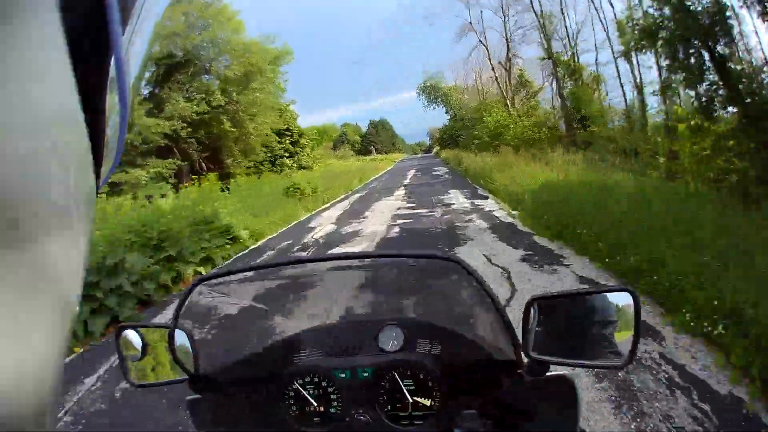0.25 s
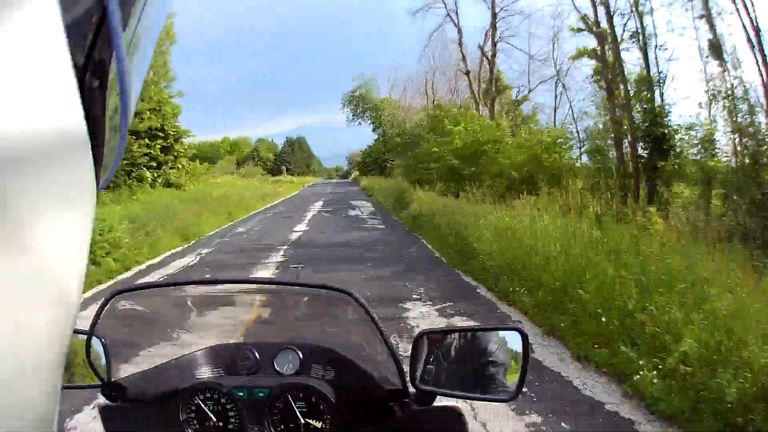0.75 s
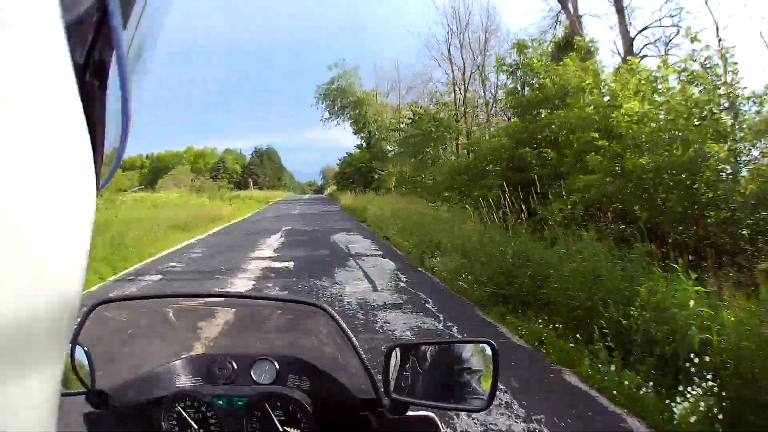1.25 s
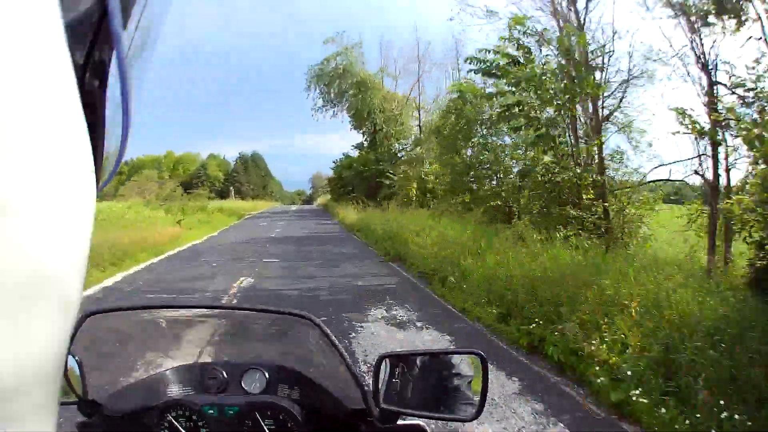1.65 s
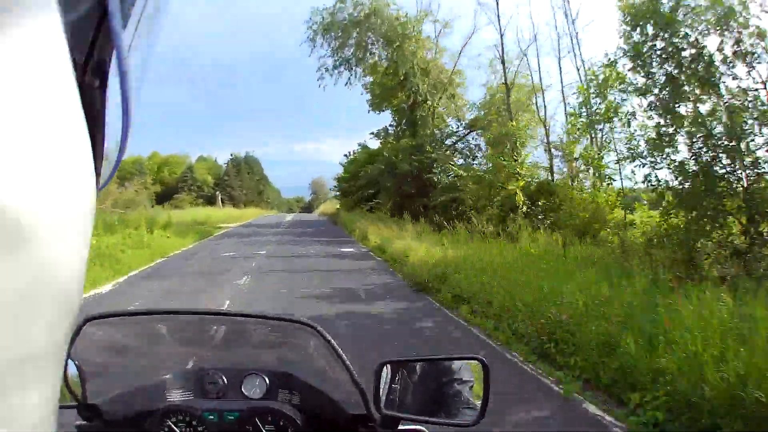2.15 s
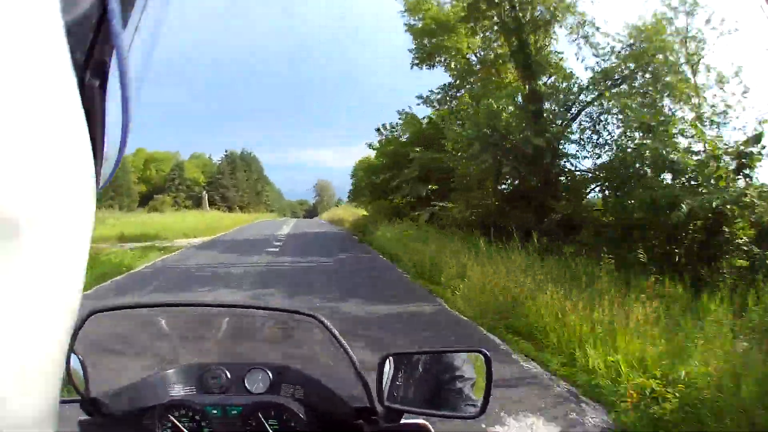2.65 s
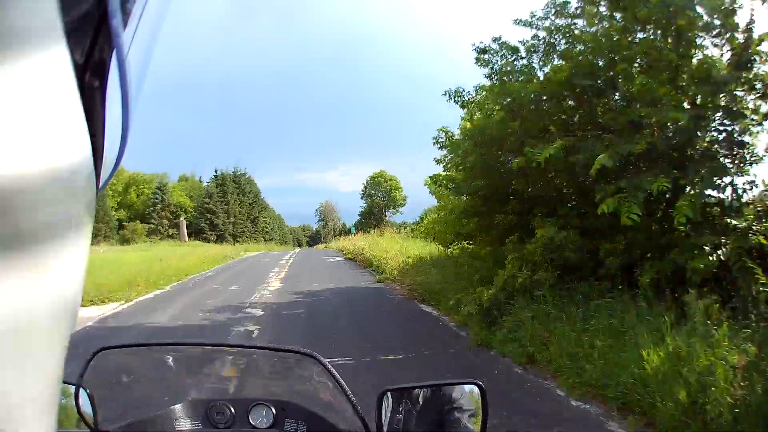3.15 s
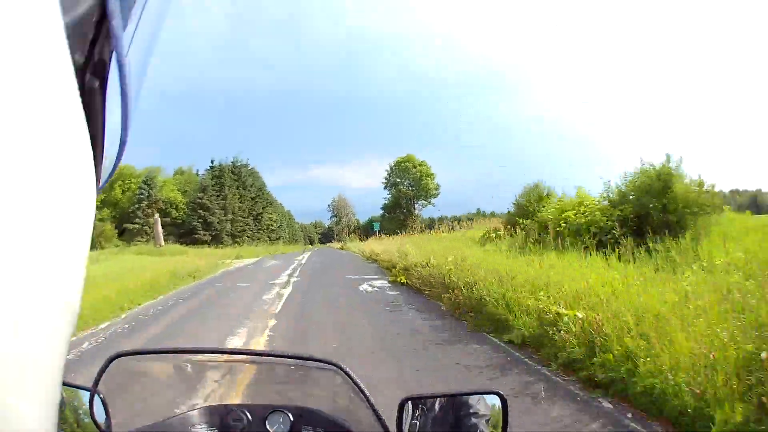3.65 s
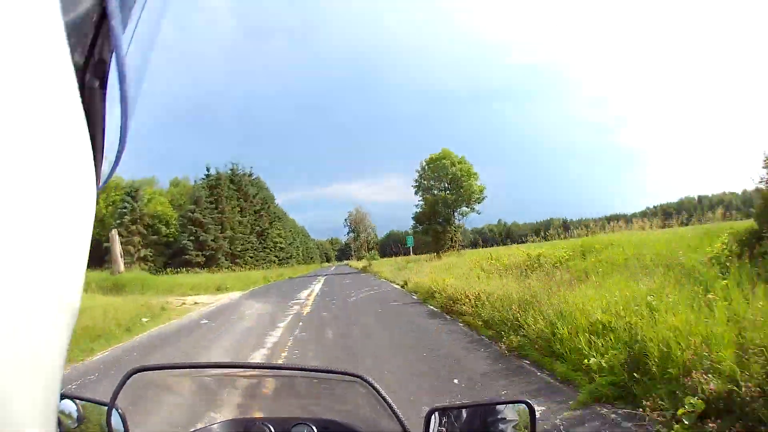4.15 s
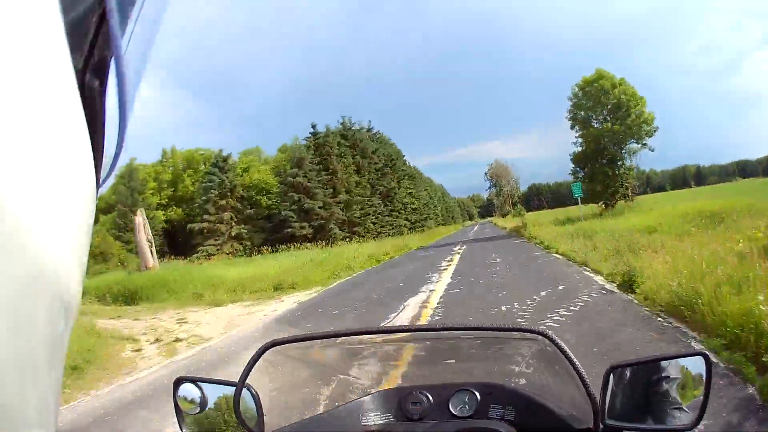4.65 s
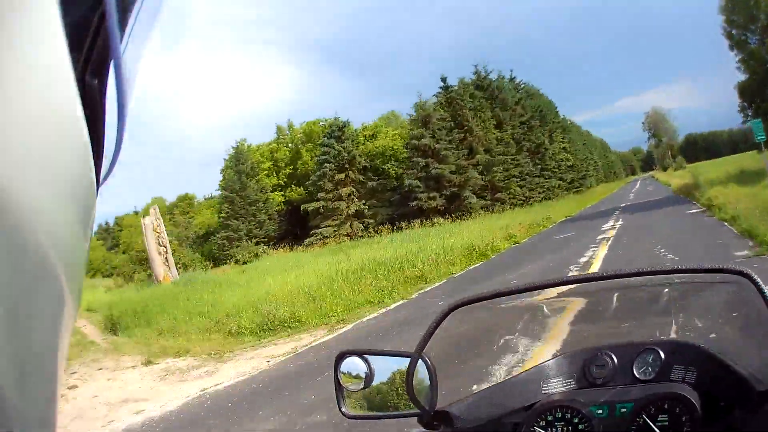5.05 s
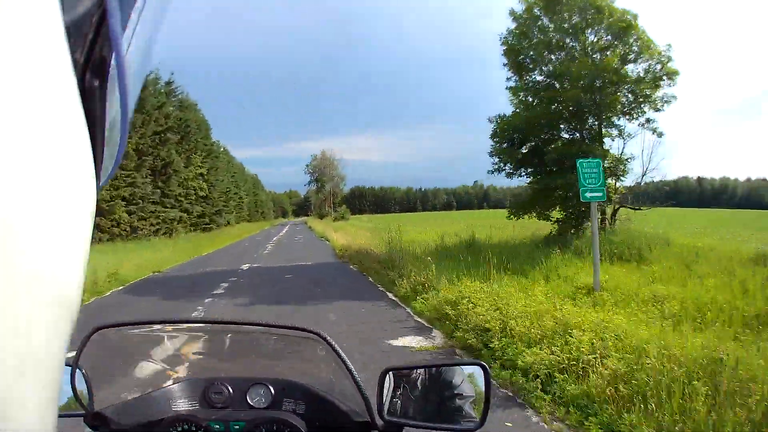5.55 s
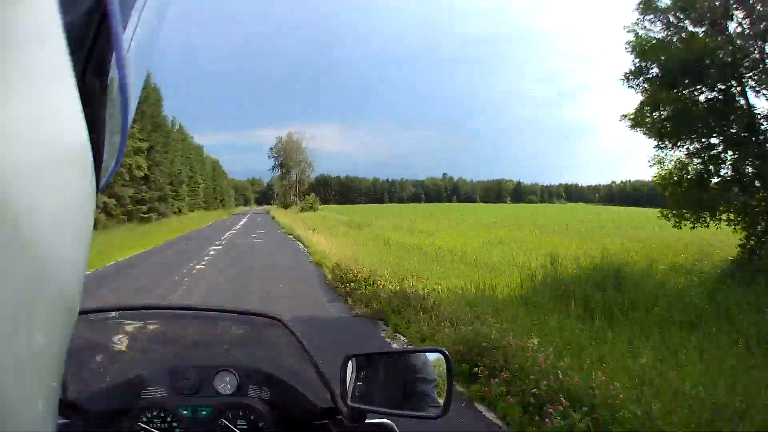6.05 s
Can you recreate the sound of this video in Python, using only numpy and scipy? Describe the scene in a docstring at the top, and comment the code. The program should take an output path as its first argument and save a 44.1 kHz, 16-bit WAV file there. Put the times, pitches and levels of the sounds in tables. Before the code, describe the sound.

Gusty wind rumbles and slaps on a microphone behind the windscreen of a moving motorcycle on a rural road. The engine holds an even drone with mechanical ticking and a thin whine, then drops away into a soft, falling burble as the bike coasts. Several patches of rough road shake the panels and loose fittings in short clattering bursts. Finally the rider blips the throttle and the revs climb.

```python
"""Motorcycle on a country road

From the rider's seat, the microphone just behind the windscreen: the bike cruises, slows with the
throttle closed, and after a blip pulls again. Gusts tumble over the microphone, which crackles faintly;
an arm's length ahead, bumps in the patched road shake the fairing and its loose fittings. From below,
the valve gear clatters, a gear whine slides with the revs and the exhaust drones with throttle and revs."""
import sys
import numpy as np
from scipy import signal
from scipy.fft import rfft, irfft, next_fast_len
from scipy.io import wavfile

SR = 44100
rng = np.random.default_rng(int(sys.argv[2]) if len(sys.argv) > 2 else 0)


def int16_out(signal):
    """Quantize to a 16-bit WAV file."""
    q = np.round(np.clip(np.atleast_2d(signal).T, -1, 1) * 32767)
    wavfile.write(sys.argv[1], SR, q.astype(np.int16))


N = 277389
CRUISE_SPEED = 49  # crank turns per s


def from_db(db):
    """Decibels to gain."""
    return 10 ** (np.asarray(db) / 20)


def unit_rms(x):
    """Scale to rms 1."""
    return x / np.sqrt(np.mean(x ** 2) + 1e-20)


def curve(rows):
    """Join (time, value) points into a value at every sample."""
    return np.interp(np.arange(N) / SR, *np.transpose(rows))


def butter(x, hz, kind):
    """Second-order Butterworth filter."""
    return signal.sosfilt(signal.butter(2, hz, kind, fs=SR, output="sos"), x + 1e-18)


def drift(rate):
    """Smooth random wander with spread 1, changing about rate times a second."""
    step, settle = 40, 2000
    pole = np.exp(-2 * np.pi * rate * step / SR)
    noise = rng.standard_normal(N // step + settle + 2)
    slow = signal.lfilter([1], [1, -2 * pole, pole ** 2], noise)[settle:]
    return np.interp(np.arange(N) / step, np.arange(len(slow)), unit_rms(slow))


def resonate(x, hz, width):
    """Two-pole resonance with gain 1 at its peak."""
    r = np.exp(-np.pi * width / SR)
    poles = [1, -2 * r * np.cos(2 * np.pi * hz / SR), r * r]
    return signal.lfilter(np.array([1, 0, -1]) * (1 - r * r) / 2, poles, x)


def colour(x, spectrum):
    """Filter by a smooth spectrum that falls 20 dB per octave beyond its ends; rms 1."""
    hz, db = np.transpose(spectrum)
    size = next_fast_len(N)
    octave = np.log2(np.maximum(np.arange(size // 2 + 1) * SR / size, 1))
    points = np.log2(hz)
    outside = np.abs(octave - np.clip(octave, points[0], points[-1]))
    gain = from_db(np.interp(octave, points, db) - 20 * outside)
    return unit_rms(irfft(rfft(x, size) * gain, size)[:N])


def grains(per_s, spread_db):
    """Clicks at random moments, a few much larger than the rest."""
    return (rng.random(N) < per_s / SR) * from_db(spread_db * np.minimum(rng.exponential(1, N), 3))


def swell(start_s, length_s, attack_s=.027, release_s=.069):
    """Attack, hold and release, from 0 to at most 1 and back."""
    t = np.arange(N) / SR - start_s
    return np.clip(np.minimum(t / attack_s, 1 - (t - length_s) / release_s), 0, 1)


def turbulence(spectrum, swirl_db, eddies_per_s, eddy_db, spread_db):
    """Smooth flow noise plus brief suctions as single eddies pass; rms 1."""
    eddies = unit_rms(butter(grains(eddies_per_s, spread_db), 7, "high"))
    flow = rng.standard_normal(N) - from_db(eddy_db) * eddies
    return colour(flow * from_db(swirl_db), spectrum)


# The loudest crackles, in the microphone itself: (time [s], relative level [dB])
MIC_CRACKLES = [(0.057, -33.5), (0.0736, -39), (0.1994, -44), (0.5087, -38.5), (0.6263, -35.5),
                (0.6873, -43), (0.7125, -41.5), (0.888, -35.5), (1.0002, -42), (1.1802, -40.5),
                (1.2152, -44), (1.408, -42), (1.432, -37.5), (1.6292, -37.5), (2.0643, -42), (2.0934, -38),
                (2.279, -43), (2.388, -37.5), (2.5843, -37.5), (2.6342, -44), (2.7811, -38), (2.8552, -37),
                (2.8935, -35.5), (3.0684, -44), (3.2817, -35), (3.3699, -34.5), (3.652, -45), (3.7584, -38),
                (3.8004, -39), (3.9038, -36.5), (4.0986, -44), (4.2718, -38), (4.2946, -57), (4.4612, -39),
                (4.5163, -42), (4.59, -44), (4.6244, -36.5), (4.6536, -45), (4.816, -34.5), (4.8499, -49),
                (5.1295, -37.5), (5.1774, -45), (5.5444, -35), (5.6136, -46), (5.6244, -38.5), (5.659, -48),
                (5.6714, -35.5), (5.8191, -36), (6.0666, -46), (6.0863, -37.5), (6.1063, -38)]
def crackle(length_s, burst_db, ticks_per_s, tick_db):
    """Bursts of tiny pressure steps and bunches of faint ticks, coloured by the microphone port."""
    s, db = np.transpose(MIC_CRACKLES)
    onsets = np.zeros(N)
    onsets[np.round(s * SR).astype(int)] = from_db(db)
    gate = signal.lfilter(np.ones(int(length_s * SR) + 1), [1], onsets)
    steps = from_db(burst_db) * gate * rng.standard_normal(N)
    ticks = from_db(tick_db) * grains(ticks_per_s * from_db(2 * drift(3)), spread_db=3)
    pressure = butter(np.cumsum(steps + ticks), 2000, "high")
    return pressure + .5 * resonate(pressure, hz=3500, width=490)


# Rush and hiss of air and tyres, all around the seat: (frequency [Hz], relative level [dB])
RUSH_SPECTRUM = [(250, -13), (420, 2), (600, -1), (800, -2.5), (1100, -9), (1450, -10.5), (1800, -16),
                 (2300, -17), (3000, -30.5), (4500, -51)]
HISS_SPECTRUM = [(1800, 6), (2800, 5.5), (3600, 3), (5000, -2), (7000, -10), (9000, -20), (12000, -21.5),
                 (16000, -38)]
# Gusts off the windscreen: (start [s], length [s], rise of the rush [dB], rise of the hiss [dB])
WINDSCREEN_GUSTS = [(-.03, 0.032, 13.5, 6.8), (0.368, 0.48, 4.5, 2.6), (1.114, 0.15, 1.5, .5),
                    (1.3, 0.26, 6, 2.3), (1.95, 0.12, 5, 3.2), (2.212, 0.16, 5, 2.3), (2.466, 0.26, 5, 1.1),
                    (2.753, 0.55, 3, 3.5), (3.53, 0.25, 5.5, 5.6), (4.38, 0.16, 5.5, 2.4),
                    (4.941, 0.17, 9, 5), (5.163, 0.578, 6, 3.3), (5.917, 0.2, 6.5, 2.6),
                    (6.143, 0.16, 5.5, 2.3)]
def airflow(revs_octaves, swirl, rush_db, hiss_db, db_per_octave):
    """Rush and hiss flutter in the windscreen's wake, rise with each gust and ease as the revs fall."""
    rises = [np.outer(rises_db, swell(s, length)) for s, length, *rises_db in WINDSCREEN_GUSTS]
    rush_rise_db, hiss_rise_db = np.max(rises, axis=0)
    rush = turbulence(RUSH_SPECTRUM, 1.21 * swirl, eddies_per_s=400, eddy_db=-5, spread_db=6.5)
    hiss = colour(rng.standard_normal(N) * from_db(2 * swirl), HISS_SPECTRUM)
    air = rush * from_db(rush_db + rush_rise_db) + hiss * from_db(hiss_db + hiss_rise_db)
    return air * from_db(db_per_octave * revs_octaves + .5 * drift(5.1))


# Deep rumble and buffeting, right on the microphone: (frequency [Hz], relative level [dB])
RUMBLE_SPECTRUM = [(18, 4), (35, -2), (70, 4), (140, 3.5), (190, -7.5), (300, -30)]
BUFFET_SPECTRUM = [(110, -12.5), (190, -0.5), (300, -1), (450, -8), (700, -27.5), (1200, -37)]
# Strength of the buffeting behind the windscreen: (time [s], relative level [dB])
WAKE_STRENGTH = [(0.0, -25.5), (0.14, -35.5), (1.7, -30), (2.0, -30.5), (2.01, -25.5), (2.31, -35),
                 (2.38, -31.5), (2.73, -34), (2.79, -31.5), (3.35, -30.5), (3.43, -36.5), (3.78, -30.5),
                 (4.01, -37.5), (4.57, -31.5), (4.64, -36.5), (4.92, -39), (5.1, -28.5), (5.17, -35),
                 (5.62, -29), (5.87, -33.5), (6.01, -26), (6.25, -33.5), (6.29, -27)]
def buffeting(swirl, buffet_db, rumble_db, rumble_follows):
    """The windscreen's wake buffets the microphone; a deep rumble follows a share of its swings."""
    wake_db = curve(WAKE_STRENGTH)
    swing_db = rumble_follows * (wake_db - wake_db.mean())
    rumble = colour(rng.standard_normal(N), RUMBLE_SPECTRUM)
    buffet = turbulence(BUFFET_SPECTRUM, 1.63 * swirl, eddies_per_s=220, eddy_db=-6, spread_db=7)
    return rumble * from_db(rumble_db + swing_db) + buffet * from_db(buffet_db + wake_db)


# Hard slaps of wind on the microphone: (time [s], peak level [dB], pitch [Hz])
WIND_SLAPS = [(0.121, -23, 700), (0.741, -18, 780), (1.719, -22.5, 650), (2.458, -21, 650),
              (3.413, -19, 450), (3.583, -22, 620), (4.949, -22, 900), (6.005, -16.5, 600)]
def slaps(cycles, rise_s):
    """A large eddy sucks at the microphone, then swings back and dies within a few cycles."""
    out, t = np.zeros(N + SR), np.arange(SR // 30) / SR
    for s, db, hz in WIND_SLAPS:
        eddy = -(1 - np.exp(-t / rise_s)) * np.exp(-t * hz / cycles) * np.sin(2 * np.pi * hz * t)
        out[int(s * SR):int(s * SR) + len(t)] += from_db(db) * eddy / np.abs(eddy).max()
    return out[:N]


# Bumps in the road, as the front wheel meets them: (time [s], relative level [dB])
ROAD_BUMPS = [(2.85, -32), (3.85, -31), (4.44, -29.5), (5.506, -27), (5.939, -23.5), (6.034, -38)]
# The shaken fairing, an arm's length ahead: (frequency [Hz], relative level [dB])
FAIRING_SPECTRUM = [(220, 1), (420, 8.5), (800, -3), (1500, -4), (2400, -17), (4000, -28)]
REAR_WHEEL_LAG_S, REAR_WHEEL_DB = .041, -12
def jolts(length_s, release_s, contacts_per_s):
    """Both wheels cross each bump and set the fairing panels crunching against their mounts."""
    contacts = grains(contacts_per_s, spread_db=3) * rng.choice([-1, 1], N)
    wheels = [(0, 0), (REAR_WHEEL_LAG_S, REAR_WHEEL_DB)]
    shaking = sum(from_db(db + wheel_db) * swell(s + lag_s, length_s, release_s=release_s)
                  for s, db in ROAD_BUMPS for lag_s, wheel_db in wheels)
    return colour(contacts, FAIRING_SPECTRUM) * shaking


# Small loose parts in the fairing: (frequency [Hz], width [Hz], relative level [dB])
SMALL_PART_MODES = [(1800, 200, 1), (2250, 250, 1), (2900, 350, -5), (3700, 400, -8), (5200, 700, -14)]
def chatter(contacts_per_s, spread_db, level_db, stirred_db):
    """Small parts tick at random, harder in each gust and after each bump."""
    gusts = [swell(s, length) for s, length, *_ in WINDSCREEN_GUSTS]
    bumps = [swell(s, 2 * REAR_WHEEL_LAG_S) for s, _ in ROAD_BUMPS]
    stirred = np.max(gusts + bumps, axis=0)
    ticks = np.zeros(N)
    for hz, width, db in SMALL_PART_MODES:
        contacts = grains(contacts_per_s, spread_db) + 1e-18 * rng.standard_normal(N)
        ticks += from_db(db) * unit_rms(resonate(contacts, hz, width))
    return from_db(level_db + stirred_db * stirred) * unit_rms(ticks)


# Loose fittings just ahead of the microphone: (time [s], relative level [dB], ring [Hz])
FITTING_RATTLES = [(1.5853, -40, 2800), (2.7616, -36, 2400), (2.8599, -34, 2600), (2.881, -34, 1700),
                   (2.940, -41, 5000), (2.990, -39, 3000), (3.2311, -37, 2300), (3.9539, -40, 4000),
                   (4.2972, -37, 2300), (4.3485, -37, 2140), (4.4437, -31.5, 2140), (4.4957, -36, 2140),
                   (4.555, -35, 2140), (4.949, -39, 3200), (5.0055, -34, 2500), (5.5119, -26, 2200),
                   (5.5368, -36, 2140), (5.5695, -32, 2300), (5.7339, -41, 2600), (5.952, -35, 2140)]
def rattles(decay_s, dull_hz, width_hz, ring_db, click_db):
    """Each contact clicks and briefly rings its loose fitting."""
    out, t = np.zeros(N + SR), np.arange(SR // 10) / SR
    for s, db, ring_hz in FITTING_RATTLES:
        contact = butter(from_db(db) * np.exp(-t / decay_s) * rng.standard_normal(len(t)), dull_hz, "low")
        ring = from_db(ring_db) * resonate(contact, ring_hz, width_hz)
        click = from_db(click_db) * resonate(contact, hz=3500, width=3000)
        out[int(s * SR):int(s * SR) + len(t)] += ring + click
    return out[:N]


# The fairing hits its mounts over the bumps, close by: (time [s], peak level [dB], brightness [Hz])
FAIRING_KNOCKS = [(2.828, -15.5, 900), (2.861, -20, 2500), (2.867, -13.5, 700), (2.874, -19, 1500),
                  (2.881, -15, 2000), (2.889, -19, 1600), (2.917, -22, 1200), (2.941, -23, 2000),
                  (2.961, -19, 900), (2.990, -18, 1200), (3.858, -21, 1500), (3.880, -15, 1400),
                  (3.917, -18, 2400), (3.934, -22, 1100), (4.472, -22, 1000), (5.519, -18, 2200),
                  (5.526, -17, 700), (5.539, -19, 2400), (5.552, -19, 1900), (5.617, -20, 1800),
                  (5.667, -21, 1700), (6.050, -21, 2200)]
# Resonances of its panels: (frequency [Hz], width [Hz], relative level [dB])
PANEL_MODES = [(342, 180, 6), (574, 230, 0), (907, 140, -6), (1250, 260, -1.5), (1510, 83, -18.5),
               (2120, 120, -24)]
def knocks(contact_s, grit, mount_hz, scatter_db, detune):
    """Each knock is a push and a short scrape that ring the panels, a little differently each time."""
    out, t = np.zeros(N + SR), np.arange(SR // 10) / SR
    for s, db, bright_hz in FAIRING_KNOCKS:
        push = signal.unit_impulse(len(t))
        scrape = grit * np.exp(-t / contact_s) * rng.standard_normal(len(t))
        contact = butter(butter(scrape - push, bright_hz, "low"), mount_hz, "low")
        ring = np.zeros(len(t))
        for hz, width, mode_db in PANEL_MODES:
            gain = from_db(mode_db + scatter_db * rng.standard_normal())
            ring += gain * resonate(contact, hz * (1 + detune * rng.uniform(-1, 1)), width)
        out[int(s * SR):int(s * SR) + len(t)] += from_db(db) * ring / np.abs(ring).max()
    return out[:N]


# The main gear whine, from below the seat: (time [s], level [dB])
WHINE_LEVEL = [(0, -41), (.3, -39.5), (1.38, -40), (1.6, -52), (2.55, -48), (3.0, -58), (3.45, -56),
               (3.57, -40), (4.0, -52), (4.85, -49), (5.05, -41), (5.5, -40), (5.65, -52)]
# Gear and chain tones: (order [cycles per crank turn], relative level [dB])
GEAR_ORDERS = [(4, -8), (5, -10), (11.5, -12), (13.17, -10), (16.5, -16), (17.5, -15), (36, -22)]
def gears(turns, tones_db, teeth_per_turn, flutter_db, waver_db, backlash_rad):
    """Meshing teeth sing at multiples of the crank speed; backlash blurs them."""
    mesh = 2 * np.pi * teeth_per_turn * turns + backlash_rad * drift(22)
    # The gear cover rings when the octave of the whine slides through its resonance.
    cover = from_db(-46) * resonate(np.sin(2 * mesh), hz=1392, width=16)
    whine = from_db(curve(WHINE_LEVEL)) * np.sin(mesh) + cover
    tones = np.zeros(N)
    for order, db in GEAR_ORDERS:
        gain = from_db(db + waver_db * drift(2.1))
        tones += gain * np.sin(2 * np.pi * order * turns + backlash_rad * drift(9.9))
    return np.sqrt(2) * (from_db(flutter_db * drift(12)) * whine + from_db(tones_db) * tones)


def drive_thump(at_s, peak_db, length_s):
    """As the throttle snaps shut, the slack of the drive is taken up in one soft push."""
    return from_db(peak_db) * np.exp(-(2 * (np.arange(N) / SR - at_s) / length_s) ** 2)


# Clatter of the engine, about a metre below the microphone: (time [s], level [dB])
CLATTER_LEVEL = [(0, -35.5), (1.45, -36.5), (1.8, -38.5), (2.5, -39.5), (3.2, -36.5), (4.1, -38),
                 (5.4, -37.5), (6.29, -42)]
# Resonances of its casing: (frequency [Hz], width [Hz], relative level [dB])
CASING_MODES = [(512, 118, -1.5), (638, 131, 4.5), (814, 143, 2), (985, 112, -2), (1361, 162, -6.5),
                (1762, 69, -6.5), (2016, 80, -10.5), (2474, 88, -16), (2760, 190, -21)]
def clatter(turns, uneven, noise, count=20):
    """Valves, pistons and cam chain knock at the same angles every two turns and ring the casing."""
    angles = (np.arange(count) + rng.random(count)) / count
    impacts = np.zeros(N)
    for angle, sign in zip(angles, rng.choice([-1, 1], count)):
        at = np.flatnonzero(np.diff(np.floor(turns / 2 + angle)))
        impacts[at] += sign * (1 + uneven * rng.standard_normal(len(at)))
    force = unit_rms(impacts) + noise * rng.standard_normal(N)
    casing = sum((-1) ** k * from_db(db) * resonate(force, hz, width)
                 for k, (hz, width, db) in enumerate(CASING_MODES))
    return from_db(curve(CLATTER_LEVEL)) * unit_rms(casing)


# Pops in the muffler, behind the seat: (frequency [Hz], relative level [dB])
BURBLE_SPECTRUM = [(110, -15.5), (175, -0.5), (240, -2.5), (340, -7), (480, -21)]
def burble(turns, revs_octaves, overrun, level_db, db_per_octave, uneven_db):
    """With the throttle closed the firings turn into uneven soft pops, strongest at high revs."""
    firings = np.diff(np.floor(turns), prepend=0)
    strength = from_db(uneven_db * np.clip(rng.standard_normal(N), -2, 2))
    pops = colour(firings * strength, BURBLE_SPECTRUM)
    return pops * overrun * from_db(level_db + db_per_octave * revs_octaves)


# The exhaust, low behind the microphone; the half orders make it lope at low revs:
# (order [cycles per crank turn], coasting level [dB], added by throttle [dB], slope [dB/octave of revs])
EXHAUST_ORDERS = [(.5, -47, -6.5, -16), (1, -26.5, -8.5, 6), (2, -22.7, 4.1, 8.5), (2.5, -49, -6, -19),
                  (3, -38.5, 11, -3)]
# The drone sags briefly: (time [s], half length [s], depth [dB])
DRONE_SAGS = [(1.72, .12, 5), (2.15, .12, 3), (2.36, .05, 4), (2.72, .06, 3), (3.95, .05, 6),
              (5.22, .05, 3), (5.78, .05, 4)]
def exhaust(turns, revs_octaves, throttle, rough_db):
    """The muffler leaves a few low orders of the firing beats, their levels set by throttle and revs."""
    # Coasting, strong and weak beats alternate; under load they even out in strength
    # and differ in spacing, so the odd orders move a quarter cycle ahead.
    lead = np.pi / 2 * np.clip(2 * throttle, 0, 1)
    drone, t = np.zeros(N), np.arange(N) / SR
    for order, db, throttle_db, db_per_octave in EXHAUST_ORDERS:
        level_db = db + throttle_db * throttle + db_per_octave * revs_octaves + rough_db * drift(34)
        phase = 2 * np.pi * order * turns + lead * (order % 2 == 1)
        drone += from_db(level_db) * np.sqrt(2) * np.cos(phase)
    sag_db = sum(db * np.clip(1 - np.abs(t - s) / half_s, 0, 1) for s, half_s, db in DRONE_SAGS)
    return drone * from_db(-sag_db)


# The crankshaft: (time [s], speed [turns/s])
CRANK_SPEED = [(0.0, 49.4), (.25, 49.3), (1.1, 48.6), (1.62, 48.2), (1.78, 47.2), (1.99, 46.9),
               (2.05, 42.6), (2.1, 42.8), (2.16, 48.2), (2.31, 46.4), (3.01, 44.7), (3.41, 42.8),
               (3.96, 38.8), (4.41, 37.2), (5.0, 36.0), (5.5, 35.2), (5.62, 34.1), (5.73, 37.5),
               (5.85, 33.7), (6.01, 34.2), (6.11, 40.6), (6.17, 43.6), (6.29, 43.3)]
# The rider holds, rolls off, coasts, blips, opens again: (time [s], throttle [0 closed, 1 cruising])
THROTTLE_OPENING = [(0, 1.15), (.17, .85), (.53, 1.25), (.86, 1.05), (1.02, .8), (1.38, 1.2), (1.6, .75),
                    (1.85, .55), (2.04, .05), (5.1, 0), (5.55, .45), (5.67, 1.1), (5.8, .15), (5.98, .5),
                    (6.12, 1.05), (6.29, .85)]
def scene():
    """Engine, wind and fairing at one microphone, riding along behind the windscreen."""
    speed, throttle = curve(CRANK_SPEED), curve(THROTTLE_OPENING)
    revs_octaves = np.log2(speed / CRUISE_SPEED)
    overrun = np.clip(1 - throttle, 0, 1)
    turns = 1 / 8 + np.cumsum(speed * (1 + .001 * drift(12))) / SR
    engine = exhaust(turns, revs_octaves, throttle, rough_db=.3)
    engine += drive_thump(at_s=2.091, peak_db=-13, length_s=.005)
    engine += burble(turns, revs_octaves, overrun, level_db=-31.5, db_per_octave=24, uneven_db=4)
    engine += clatter(turns, uneven=.44, noise=.67)
    tones_db = curve(CLATTER_LEVEL) - 7 * overrun  # unloaded gears sing more softly
    engine += gears(turns, tones_db, teeth_per_turn=15, flutter_db=.7, waver_db=2, backlash_rad=.4)
    swirl = drift(92)  # buffeting, rush and hiss flutter together
    wind = buffeting(swirl, buffet_db=-1, rumble_db=-30, rumble_follows=.86)
    wind += airflow(revs_octaves, swirl, rush_db=-39, hiss_db=-58.5, db_per_octave=1)
    wind += slaps(cycles=.9, rise_s=.0005)
    fairing = jolts(length_s=.011, release_s=.039, contacts_per_s=1500)
    fairing += knocks(contact_s=.005, grit=.35, mount_hz=2800, scatter_db=3, detune=.1)
    fairing += rattles(decay_s=.003, dull_hz=4200, width_hz=200, ring_db=18, click_db=-5)
    fairing += chatter(contacts_per_s=28, spread_db=3.5, level_db=-60.5, stirred_db=4)
    microphone = crackle(length_s=.0016, burst_db=-4, ticks_per_s=14, tick_db=-36)
    return (microphone + wind + fairing + engine)[None]


def record(dry):
    """The recorder cuts the deepest rumble and the highest treble."""
    treble_cut = signal.cheby2(14, 70, 16200, fs=SR, output="sos")
    return signal.sosfilt(treble_cut, butter(dry, 16, "high"))


dry = scene()
out = record(dry)
int16_out(out)
```